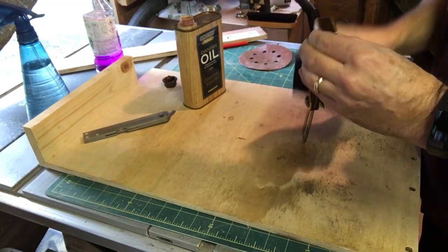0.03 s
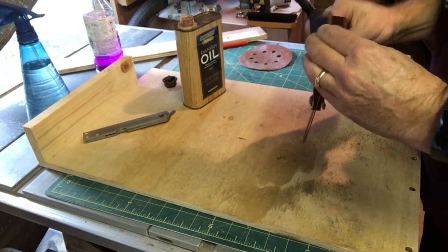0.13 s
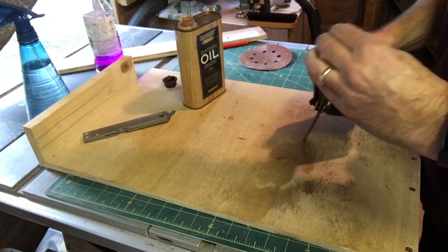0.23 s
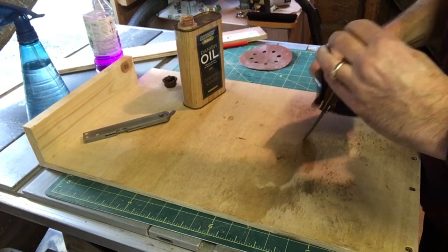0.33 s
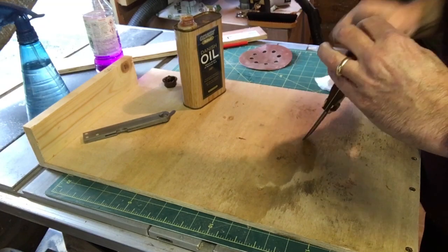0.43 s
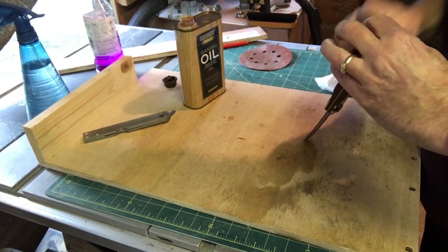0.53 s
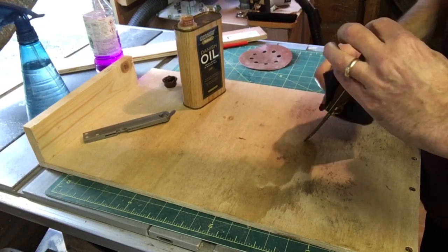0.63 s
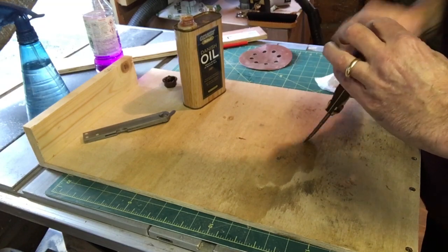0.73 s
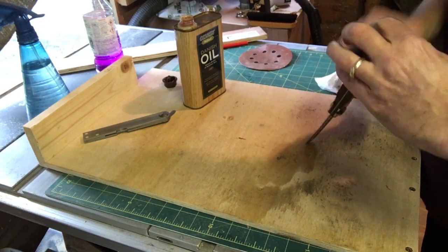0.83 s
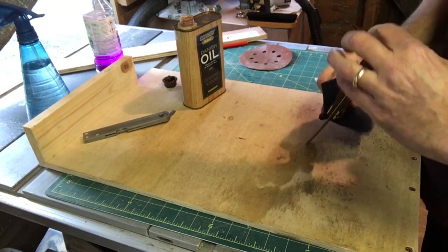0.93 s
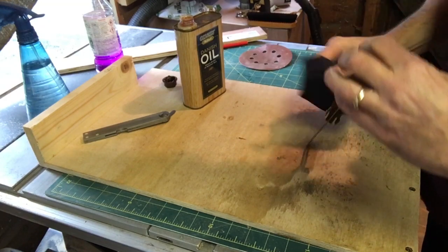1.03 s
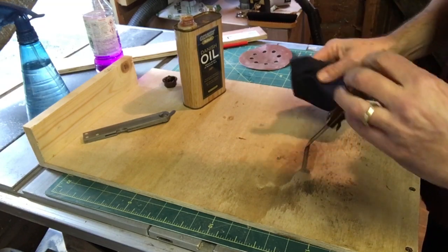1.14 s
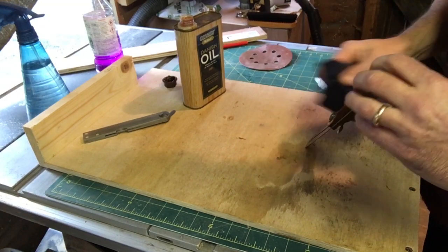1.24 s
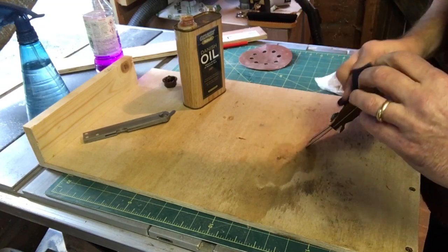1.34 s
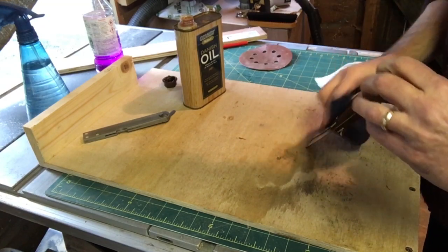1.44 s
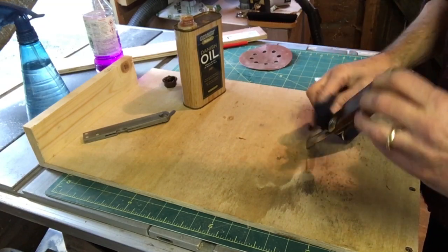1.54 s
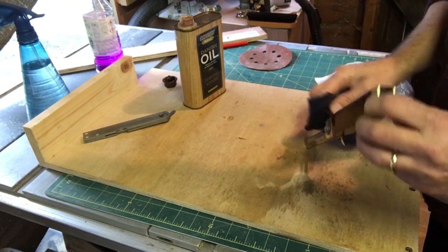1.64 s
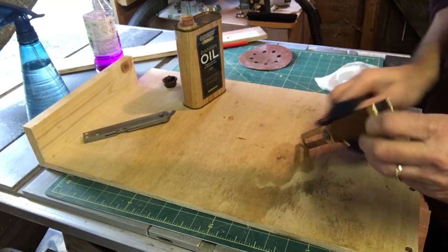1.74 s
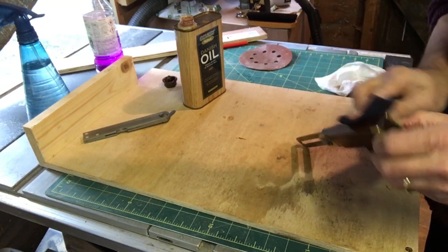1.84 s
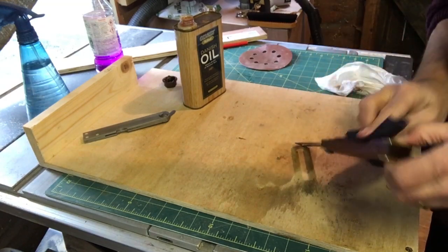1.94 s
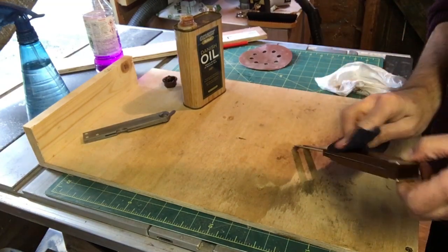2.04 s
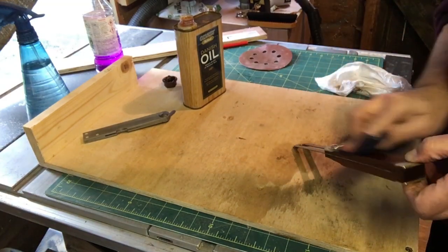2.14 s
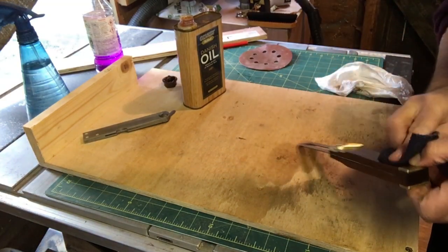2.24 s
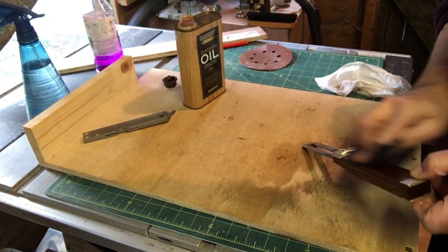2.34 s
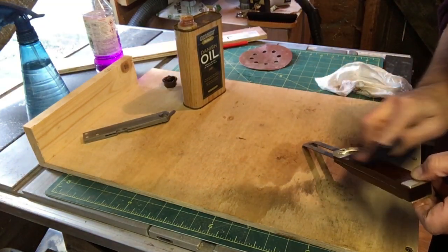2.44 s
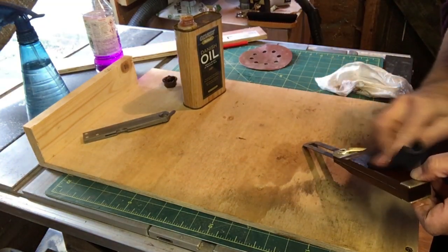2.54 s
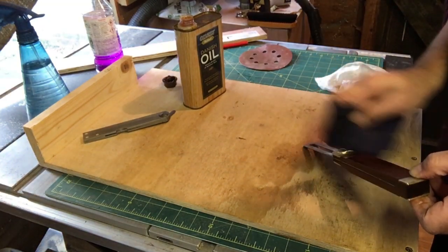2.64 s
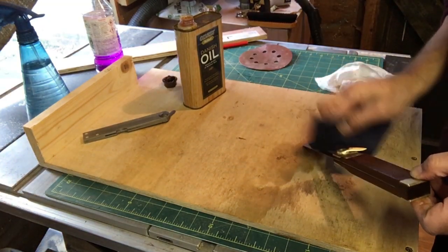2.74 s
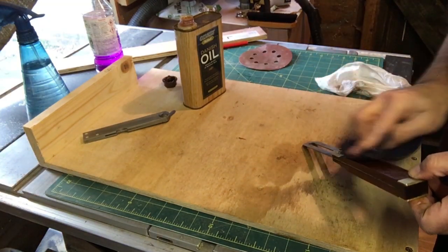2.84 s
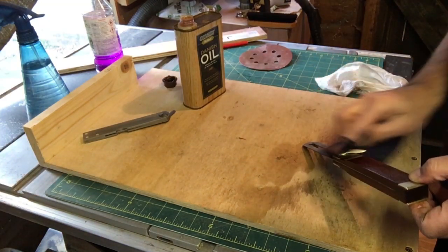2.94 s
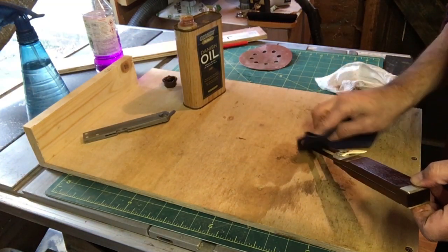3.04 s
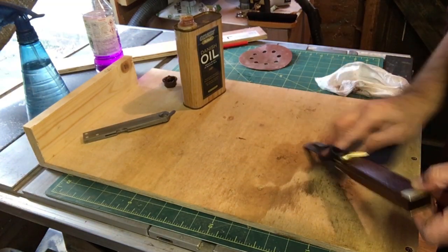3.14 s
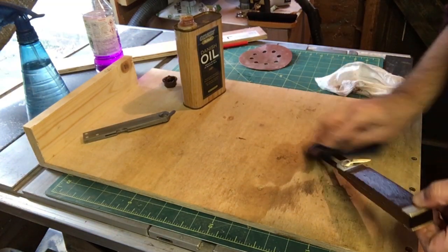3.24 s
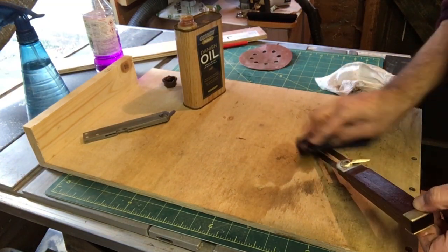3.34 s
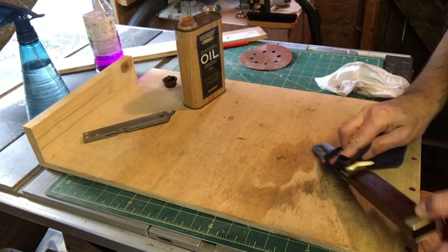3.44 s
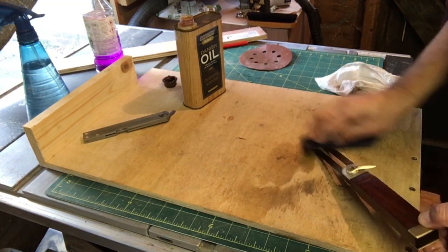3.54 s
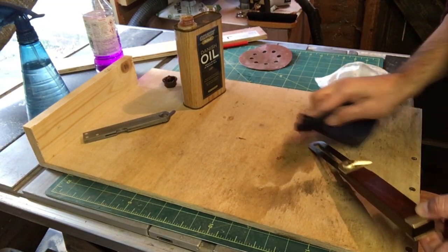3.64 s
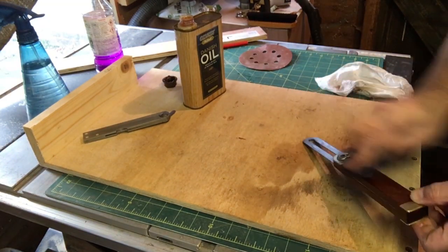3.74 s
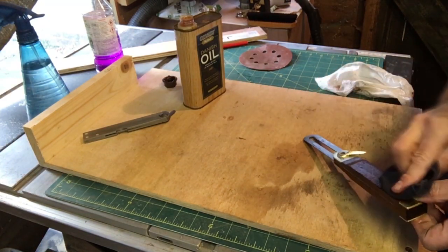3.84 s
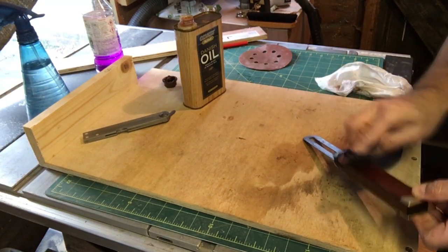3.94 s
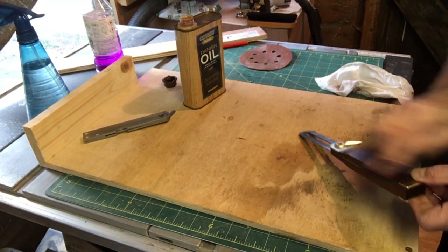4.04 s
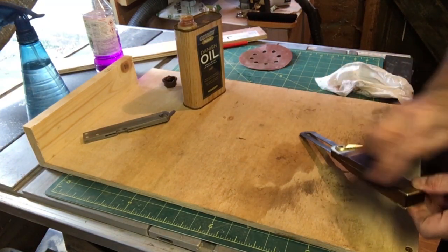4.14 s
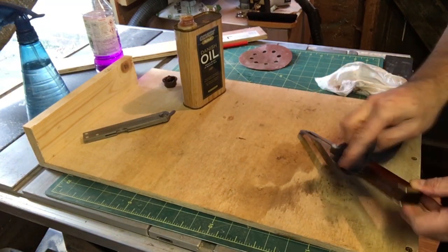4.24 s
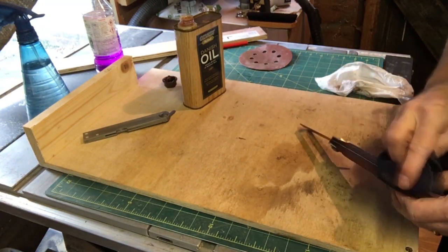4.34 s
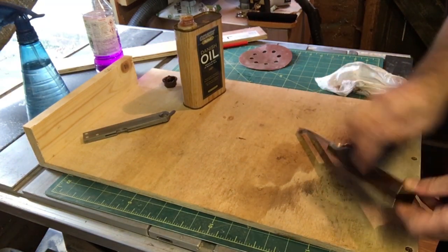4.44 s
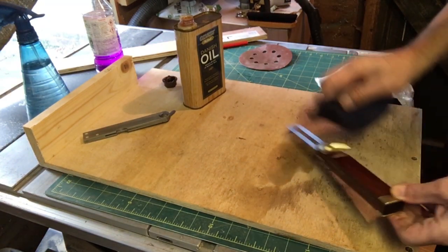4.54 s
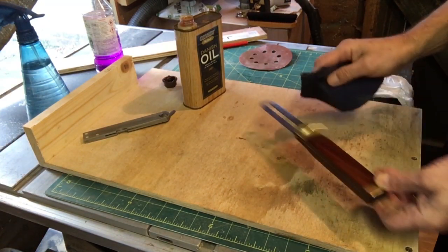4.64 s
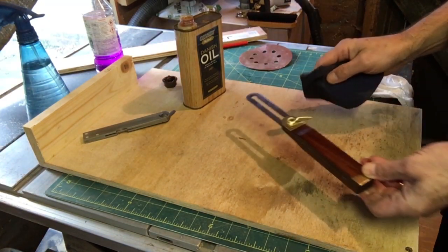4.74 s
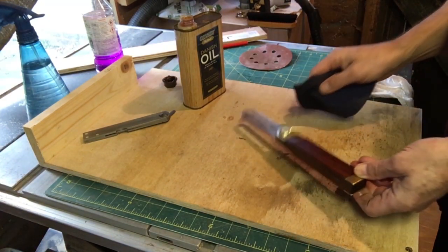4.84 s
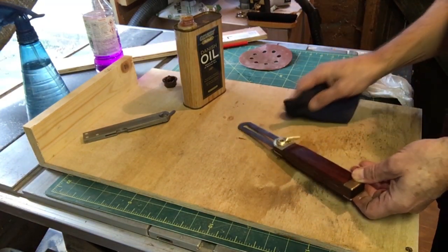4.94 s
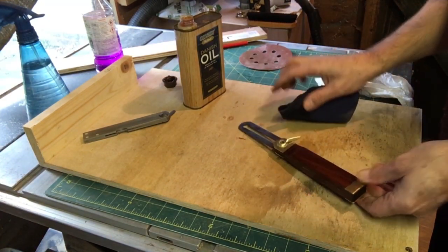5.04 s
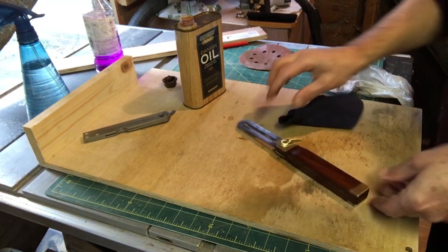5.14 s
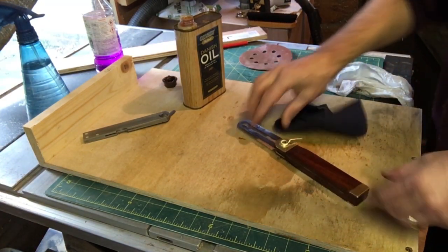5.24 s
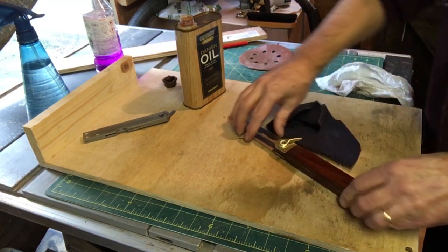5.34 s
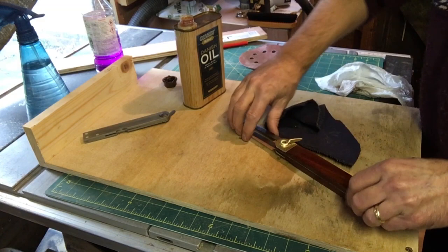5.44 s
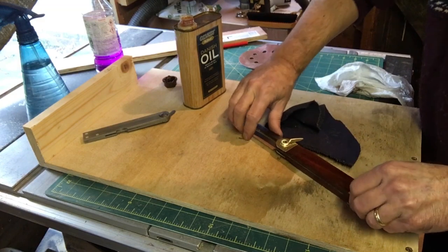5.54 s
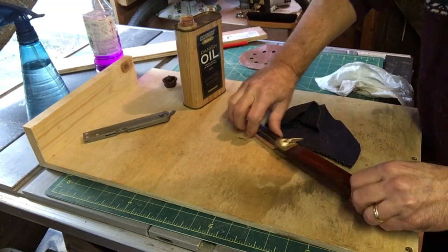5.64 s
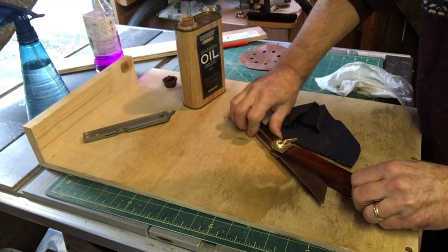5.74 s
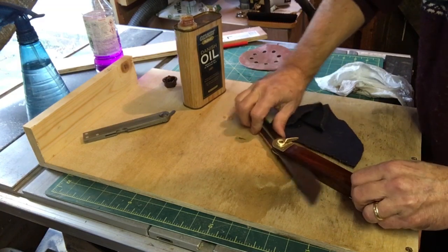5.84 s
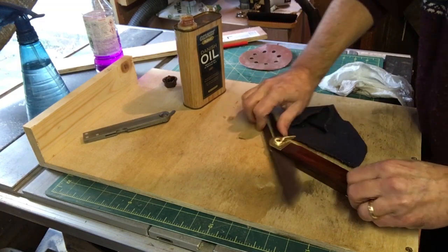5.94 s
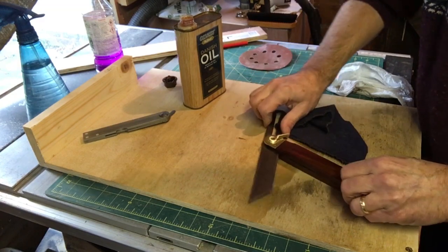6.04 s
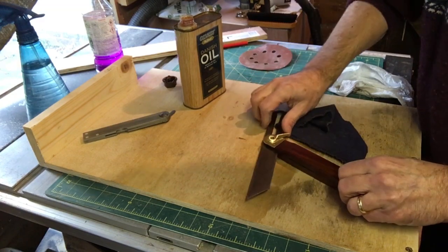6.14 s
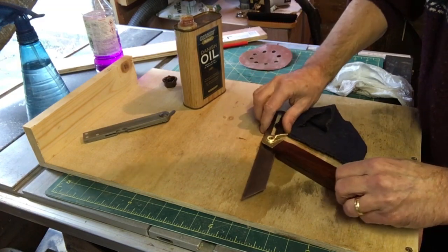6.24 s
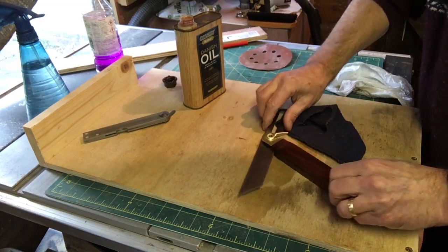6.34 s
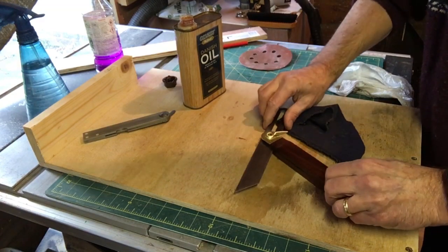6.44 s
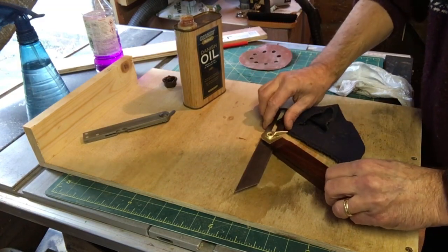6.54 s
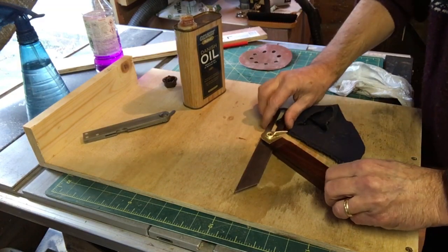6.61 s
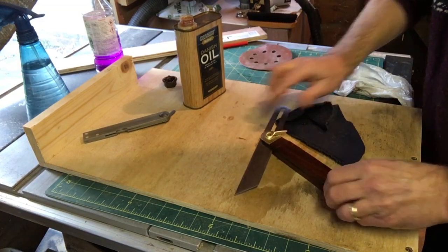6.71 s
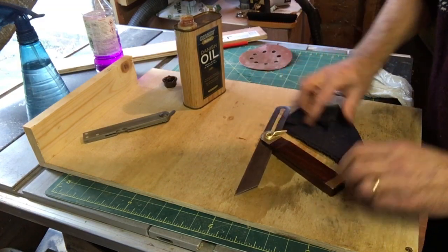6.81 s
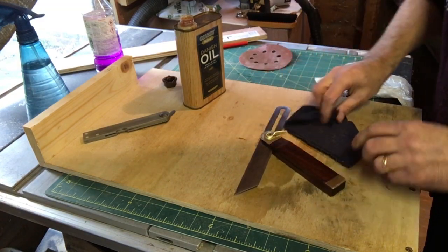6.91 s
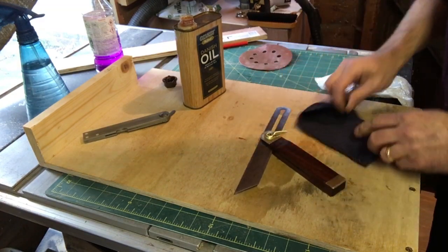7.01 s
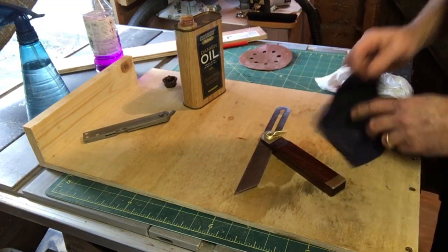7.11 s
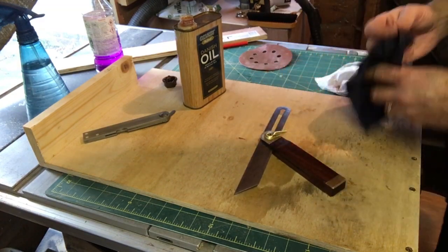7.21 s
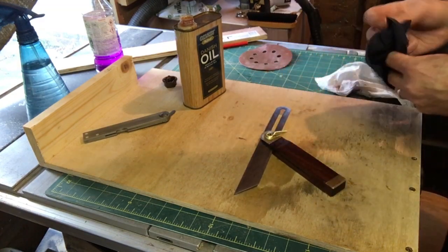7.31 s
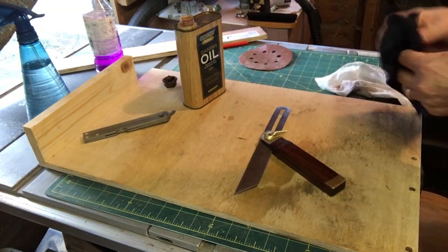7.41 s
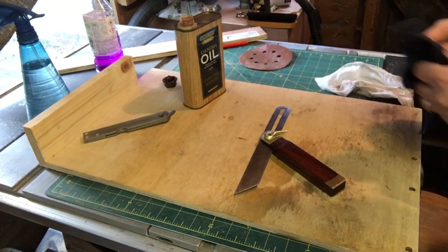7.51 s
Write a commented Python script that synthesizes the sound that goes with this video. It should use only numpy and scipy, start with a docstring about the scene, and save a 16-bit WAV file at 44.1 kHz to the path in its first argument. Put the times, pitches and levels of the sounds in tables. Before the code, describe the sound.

Close miked and nearly dry: dry, hissing cloth strokes over wood and steel, growing firmer, with faint bumps, gritty scratches and tiny squeaks as the tool skids on plywood. Rubbing stops; bright steel clacks lead into a hard wooden knock and chatter. Then come softer knocks, a metal blade sliding open in short scrapes, a near-quiet gap, and a couple of quick cloth rustles over faint room rumble.

```python
"""In a small, dry workshop with a low rumble, an oily cloth wipes a sliding bevel, its tip resting on a plywood board.
The tip drags and bumps; then the steel blade taps down, the wooden handle drops and rocks, and the blade is swung
open over the wood. The cloth is picked up again. One close microphone.
Rubbing is made of dense random slips, coloured or sent through resonances; blows are noise cracks with ringing modes."""
import sys
import numpy as np
from scipy import signal
from scipy.fft import rfft, irfft
from scipy.io import wavfile
from scipy.ndimage import uniform_filter1d

SR = 44100
rng = np.random.default_rng(int(sys.argv[2]) if len(sys.argv) > 2 else 0)


def store_wav(level_fs):
    """Save 16-bit WAV to argv[1]."""
    pcm = np.round(np.clip(np.atleast_2d(level_fs), -1, 1) * 32767)
    wavfile.write(sys.argv[1], SR, pcm.T.astype(np.int16))


N = 333816  # length of the scene in samples
RING = SR // 2  # longest ring of one event in samples

# Spectra of noise: f/Hz, relative density/dB per Hz
# workshop background
SHOP_COLOUR = [(20, -26.5), (45, 0), (75, 1), (115, -7), (180, -13.5), (280, -14.5), (480, -21.5),
               (1000, -24), (2500, -28), (6000, -32.5), (10000, -42), (15500, -52.5)]
# bench booming under the board
BENCH_COLOUR = [(40, -25), (70, -9.5), (115, -7.5), (165, 1), (200, -16), (400, -41)]
# crowded resonances of the struck board
BOARD_COLOUR = [(60, -23), (150, -15), (200, -24.5), (255, -1.5), (400, -5.5), (480, -12), (900, -2.5),
                (1900, -3.5), (2700, -9), (4500, -10.5), (7000, -18), (10400, -36.5), (12000, -32.5),
                (16000, -44.5)]
# crowded resonances of the struck blade
BLADE_COLOUR = [(190, -42), (255, -13), (385, -5), (490, -24), (780, -20), (1100, -5), (1500, -13),
                (2050, 3), (2750, -10), (3400, -5), (4150, -5), (4600, -16), (5350, -1), (6400, -14),
                (7400, -8), (8600, -21), (16000, -22)]
# board rumbling under a sliding tool
RUMBLE_COLOUR = [(90, -27), (170, -18), (210, -7.5), (250, 2), (320, -5.5), (400, 0.5), (490, -21.5),
                 (590, -1.5), (900, -25), (2000, -65)]
# hiss of the tip on the grain
SCRAPE_COLOUR = [(300, -36), (500, -25), (650, -2), (780, -4), (900, 2), (1150, 0), (1400, 2), (2200, 0.5),
                 (3400, -6), (4800, -9), (6200, -11.5), (8500, -31.5), (15000, -49)]
# fibres of the cloth
CLOTH_COLOUR = [(150, -28), (270, -5), (380, -16.5), (490, -9.5), (700, -14.5), (1300, -4.5), (2200, -1.5),
                (3100, 1), (4700, -3.5), (6000, -2.5), (8200, -8.5), (10300, -11.5), (11500, -10),
                (15500, -13.5)]

# Resonances: f/Hz, relative level/dB, t60/s
# plywood board
BOARD_MODES = [(247, -6, 0.27), (405, -9, 0.21), (565, -12, .33), (775, -13, 0.14), (838, -11, 0.16),
               (900, -7, 0.17), (945, -9, .14), (1190, -10, 0.22), (1259, -9, 0.18), (1364, -8, 0.14),
               (1431, -11, .12), (1687, -10, 0.14), (1815, -8, 0.16), (1990, -4, 0.09), (2549, 6, 0.042),
               (3130, 0, 0.05), (4366, -9, .06), (4750, -4, .035)]
# free steel blade
BLADE_MODES = [(262, -23, .16), (335, -16, .15), (392, -14, .14), (1030, -13, .08), (1200, -10, .09),
               (1413, -15, .08), (1760, -11, .07), (1945, 3, .028), (2220, -1, .045), (3180, -9, .07),
               (3580, -9, .04), (4170, -4, .03), (5300, 2, .015), (5620, 1, .015)]
# tool standing on its tip
TIP_MODES = [(265, -7.5, 0.079), (316.5, -9.5, .12), (386, -13.5, 0.097), (692, -16.5, 0.081),
             (944, -10.5, 0.1), (1118, -7, 0.1), (1428, -0.5, 0.059), (1770, -8.5, .1), (2200, 2, 0.022),
             (2507, -4, 0.051), (2920, -12, 0.06), (3380, -4, 0.04), (3960, 2.5, 0.019),
             (4540, -6.5, 0.028), (5900, -0.5, 0.017), (7030, -7, 0.027)]

# Weight landing on the board and shaking the bench, first the tool, then a hand: t/s, starting level/dB, t60/s
THUMPS = [(5.1526, -47.5, 0.33), (7.161, -53.5, 0.088)]
# Tool dropping flat, chattering, rocking and being pressed down: t/s, level/dB, contact brightness f/Hz, thud/dB
KNOCKS = [(5.0822, -40, 1500, 9), (5.09, -41.5, 700, 6), (5.1544, -15.5, 12500, -9),
          (5.1586, -21.5, 6500, -3), (5.172, -32.5, 480, 1), (5.2634, -32.5, 4380, 1), (5.308, -47, 520, 6),
          (5.407, -33, 4000, 1), (5.497, -38.5, 3480, 0.5), (6.148, -38.5, 846, 4.5), (6.149, -49, 2600, 7),
          (6.397, -49, 1500, -1.5)]
# Steel blade tapping down and bouncing: t/s, level/dB, contact brightness f/Hz
TAPS = [(4.912, -19, 11100), (4.967, -21.5, 8860), (5.0025, -32.5, 6200), (5.02, -42.5, 5970)]
# Held tool bumping its tip on the board: t/s, level/dB, contact brightness f/Hz, thud/dB
BUMPS = [(.249, -60, 2500, 17), (.517, -51.5, 2500, 4), (.796, -56, 2000, -8), (.801, -48, 1800, -10),
         (.816, -38.5, 3180, 4), (.992, -54, 2300, 13), (1.016, -60, 1190, 16), (2.2775, -39, 3500, -8),
         (2.2815, -39, 2520, -7), (2.727, -62, 7000, -7), (2.983, -52.5, 6500, -5), (4.103, -45, 3400, -7),
         (5.978, -50.5, 1300, -9)]
# Short scratches where an edge catches: t/s, rise/s, fall/s, level/dB, brightness f/Hz
SCRATCHES = [(0.507, 0.011, 0.0076, -45, 4740), (0.703, 0.015, 0.015, -46.5, 3400),
             (0.906, .004, 0.0072, -50.5, 5000), (2.98, 0.003, 0.0095, -44, 9100),
             (3.158, 0.027, 0.017, -39.5, 6400), (3.282, 0.0048, 0.02, -42.5, 7450),
             (3.392, 0.0038, 0.0049, -45, 3000), (3.451, 0.0077, 0.017, -40.5, 6700),
             (4.5, 0.019, 0.0068, -56, 3960), (7.077, 0.0009, 0.0037, -50, 11800),
             (7.310, 0.013, 0.013, -42.5, 7940)]
# Oily wood sticking and singing briefly: t/s, length/s, first pitch f/Hz, last pitch f/Hz, level/dB
SQUEAKS = [(3.448, 0.035, 2230, 2300, -45.5), (3.629, 0.25, 390.4, 378, -61.5),
           (3.71, 0.2, 2175, 2284, -53.5), (3.743, 0.061, 1452, 2170, -51), (4.019, 0.075, 1703, 1610, -52),
           (4.051, 0.063, 907, 886, -49), (4.06, 0.1, 308, 296, -58.5), (6.286, 0.025, 1400, 1380, -55.5)]

# Sliding moves; levels are peaks, before smearing and layer gains. The fastest point is held within 0.1-0.9.
# Blade pushed round over the wood: t/s, length/s, fastest point/share of length,
# hiss level/dB, scrape level/dB, board rumble level/dB, whistle level/dB
SWINGS = [(5.817, 0.17, 0.28, -55, -55, -71, -54), (5.953, 0.11, 0.24, -61, -50.5, -72, -51),
          (6.123, 0.11, 0.52, -69.5, -54, -62, -62), (6.23, 0.095, 0.2, -68, -57.5, -63, -62),
          (6.3, 0.18, 0.36, -82, -53, -57.5, -78)]
# Tool or hand skidding over the board: t/s, length/s, fastest point/share of length,
# scrape level/dB, board rumble level/dB
SKIDS = [(0.185, 0.12, 0.85, -85, -67), (0.421, 0.18, 0.8, -63.5, -68), (0.695, 0.11, 0.2, -59, -63),
         (0.82, 0.28, 0.05, -71, -61), (1.416, 0.088, 0.6, -62, -64), (1.788, 0.054, 0.5, -60.5, -64),
         (2.043, 0.13, 0.19, -55, -61), (2.406, 0.062, 0.5, -60, -68.0), (2.571, 0.049, 0.48, -60.5, -76),
         (2.718, 0.17, 0.42, -58.5, -64), (3.128, 0.26, 0.27, -56, -70.5),
         (3.287, 0.53, 0.19, -56.5, -67.5), (3.576, 0.17, 0.8, -53.5, -72), (3.676, 0.22, 0.34, -49.5, -73),
         (3.934, 0.23, 0.24, -50, -65), (4.146, 0.1, 0.36, -57.5, -82), (4.463, 0.089, 0.3, -77, -66.5),
         (5.278, 0.39, 0.6, -58, -60), (5.652, 0.05, 0.2, -43.5, -76), (5.67, 0.1, 0.15, -53, -66),
         (6.813, 0.18, 0.45, -62.5, -75.5), (7.089, 0.12, 0.6, -53, -62), (7.302, 0.078, 0.56, -49, -59)]
# Cloth or skin sliding, one row per stroke of the hand: t/s, length/s, fastest point/share of length, level/dB
STROKES = [(0.0, 0.17, 0.44, -57), (0.15, 0.13, 0.6, -57.5), (0.275, 0.05, 0.4, -61),
           (0.342, 0.19, 0.53, -57.5), (0.541, 0.14, 0.65, -54.5), (0.681, 0.15, 0.27, -52),
           (0.808, 0.2, 0.33, -56), (1.281, 0.094, 0.72, -58), (1.359, 0.17, 0.6, -53.5),
           (1.681, 0.36, 0.2, -60.5), (1.925, 0.17, 0.68, -60), (2.138, 0.11, 0.91, -52.5),
           (2.259, 0.16, 0.52, -55.5), (2.421, 0.13, 0.3, -58), (2.554, 0.19, 0, -66),
           (2.733, 0.16, 0.73, -54), (2.897, 0.22, 0.33, -55), (3.089, 0.14, 0.43, -54.5),
           (3.213, 0.12, 0.82, -52.5), (3.333, 0.14, 0.15, -54.5), (3.491, 0.12, 0.7, -50),
           (3.692, 0.17, 0.77, -50.5), (3.879, 0.15, 0.22, -53.5), (4.003, 0.11, 0.6, -49.5),
           (4.134, 0.13, 0.18, -57.5), (4.254, 0.13, 0.5, -54.5), (4.396, 0.079, 0.32, -58),
           (5.06, 0.12, 0.6, -67), (5.31, 0.097, 0.5, -63.5), (5.43, 0.38, 0.08, -67.5),
           (5.646, 0.078, 0.26, -43.5), (6.806, 0.26, 0.55, -69), (7.066, 0.15, 0.4, -52),
           (7.217, 0.17, 0.55, -64.5), (7.306, 0.11, 0.28, -46), (7.427, 0.09, 0.75, -55.5)]
# Hands at work on tool or cloth: start t/s, end t/s
HELD_S = [(0.0, 0.95), (1.66, 4.54), (5.64, 6.47), (6.81, 9.06)]

SHOP_DB = -65
TOP_HZ = 15850  # treble limit of the microphone path
STROKE_SWELL, SKID_SWELL = 1.21, 1  # loudness as a power of speed: strokes; skids and the swinging blade
SMEAR_S = 0.0086  # no move starts or stops dead
WIPE_SCRAPE_DB, WIPE_RUMBLE_DB = -17, -18.5  # what a stroke stirs in tool and board, against its own drive
REST_RUSTLE_DB, REST_SCRAPE_DB = -73, -72  # the hands never keep quite still
SQUEAK_WAVER, SQUEAK_WAVER_RATE = .06, 400  # spread as a share of pitch, changes a second
CAUGHT_S, CAUGHT_DECAY_S = 5.235, 0.012  # fingers land on the fallen tool and stop its ring
BLOOM_CYCLES, BLOOM_T60_S = 1.7, 0.061  # the low notes of a blow take a moment to build
MODE_DETUNE = 0.0055  # spread of pitch from blow to blow, as a share
TWIN_SPLIT_HZ, TWIN_DB = 32, -3.5  # each mode has a weaker twin close by: spread, level
SNAP_RATE, SNAP_DB = 500, -8  # single threads snapping: a second, dB against the fine grain
FOLD_DB, FOLD_RATE = 1.2, 14  # colour shift with the folds: dB, changes a second
TAP_ECHO_S, TAP_ECHO = .0038, .7  # bench echo of a tap: delay, gain


def undb(db):
    """Decibels to gain."""
    return 10 ** (np.asarray(db) / 20)


def unit(x, count=None):
    """Scale to rms 1, judged over the first count samples."""
    return x / np.sqrt(np.mean(x[:count] ** 2))


def colour(x, points):
    """Shape a sound with a spectrum of (Hz, dB) points, joined along log frequency."""
    hz, db = np.transpose(points)
    bins = np.maximum(np.fft.rfftfreq(len(x), 1 / SR), 1)
    gain = undb(np.interp(np.log(bins), np.log(hz), db))
    return irfft(rfft(x) * gain, len(x))


def cut(x, hz, kind, order=2):
    """Butterworth filter, its corner kept below the top of the band."""
    edge = np.minimum(hz, .47 * SR)
    return signal.sosfilt(signal.butter(order, edge, kind, fs=SR, output="sos"), x)


def fade(t60):
    """Exponential decay, falling 60 dB in t60 seconds."""
    return np.exp(-np.log(1000) * np.arange(RING) / SR / t60)


def walk(rate):
    """Smooth random wander of rms 1 or near it, with rate changes a second."""
    step = max(int(SR / rate), 1)
    held = np.repeat(rng.standard_normal(N // step + 1), step)
    return unit(uniform_filter1d(held, step))[:N]


def add(track, s, sound):
    """Mix a sound into a track at a time."""
    start = int(s * SR)
    track[start:start + len(sound)] += sound[:N - start]


def during(start, end):
    """A gate that opens and closes softly."""
    t = np.arange(N) / SR
    is_open = 1. * ((t > start) & (t < end))
    return uniform_filter1d(is_open, SR // 50)


def slips(rate, spread_db):
    """Stick-slip: tiny random clicks of uneven size, rate a second."""
    hit = rng.random(N) < rate / SR
    size = undb(spread_db * np.minimum(rng.exponential(size=N), 4))
    return unit(hit * rng.standard_normal(N) * size)


def shop():
    """Low rumble with a faint hiss: coloured noise whose level drifts slightly."""
    level = undb(SHOP_DB + 0.63 * walk(rate=2.9))
    return level * unit(colour(rng.standard_normal(N), SHOP_COLOUR))


def room(x, wet_db, low_t60, high_t60):
    """A cluttered workshop: a brief diffuse tail whose treble dies first."""
    noise = rng.standard_normal(RING)
    low = cut(noise, 2200, "low", order=1) * fade(low_t60)
    high = cut(noise, 3000, "high", order=1) * fade(high_t60)
    tail = (low + high) * (1 - fade(0.12))  # the walls answer a little later
    reverb = signal.fftconvolve(x, tail / np.linalg.norm(tail))[:N]
    return x + undb(wet_db) * reverb


def thump():
    """The bench under the board answers with a short, low boom of decaying noise."""
    out = np.zeros(N)
    for s, db, t60 in THUMPS:
        boom = unit(colour(rng.standard_normal(RING), BENCH_COLOUR))
        add(out, s, undb(db) * boom * fade(t60))
    return out


def ring(modes, scatter_db):
    """Modes in close, beating pairs; where the blow lands sets the strength, sign and exact pitch of each."""
    out, t = 0, np.arange(RING) / SR
    draws = rng.standard_normal((len(modes), 5))
    for (hz, db, t60), (size, sign, shift, split, phase) in zip(modes, draws):
        hz = hz * (1 + MODE_DETUNE * shift)
        main = np.sign(sign) * np.sin(2 * np.pi * hz * t)
        twin = np.sin(2 * np.pi * ((hz + TWIN_SPLIT_HZ * split) * t + phase))
        pair = main + undb(TWIN_DB) * twin
        bloom = 1 - np.exp(-t * hz / BLOOM_CYCLES)
        out = out + undb(db + scatter_db * size) * pair * fade(t60) * bloom
    return out


def blow(modes, points, crack_t60, body_t60, body_db, modes_db, body_hz=4300):
    """One impact: a short crack, a duller wash of crowded modes, and the clear modes."""
    crack, wash = (unit(colour(rng.standard_normal(RING), points)) for _ in range(2))
    body = cut(wash, body_hz, "low", order=1) * fade(body_t60)
    crowd = crack * fade(crack_t60) + undb(body_db) * body
    crowd = crowd - cut(crowd, 500, "low", order=1) * fade(BLOOM_T60_S)
    clear = ring(modes, scatter_db=1.2)
    return unit(crowd, count=SR // 100) + undb(modes_db) * unit(clear, count=SR // 100)


def strike(rows, response):
    """Wood is struck: a softer contact is duller; a hand's weight behind it adds thud and damps the ring."""
    out, t = np.zeros(N), np.arange(RING) / SR
    for s, db, bright_hz, thud_db in rows:
        hit = response() * np.exp(-t * 5.0 * max(thud_db, 0))
        hit = hit + (undb(thud_db) - 1) * cut(hit, 750, "low", order=1)
        hit = cut(hit, 220, "high", order=3)  # the small board radiates little bass
        hit = cut(hit, bright_hz, "low", order=3)
        add(out, s, undb(db) * unit(hit, count=SR // 100))
    return out


def knocks():
    """The tool falls flat and chatters; the board rings until fingers catch it, then the tool rocks under the hand."""
    def board():
        return blow(BOARD_MODES, BOARD_COLOUR, crack_t60=0.039, body_t60=0.15, body_db=-7.5, modes_db=-1.0)

    falling = strike([row for row in KNOCKS if row[0] < CAUGHT_S], board)
    rocking = strike([row for row in KNOCKS if row[0] >= CAUGHT_S], board)
    since_caught = np.maximum(np.arange(N) / SR - CAUGHT_S, 0)
    return falling * np.exp(-since_caught / CAUGHT_DECAY_S) + rocking


def taps():
    """Steel on plywood: a sharp, bright clack, echoed at once by the bench."""
    out = np.zeros(N)
    for s, db, bright_hz in TAPS:
        hit = blow(BLADE_MODES, BLADE_COLOUR, crack_t60=.016, body_t60=.125,
                   body_db=-10, modes_db=-2, body_hz=1800)
        echo = np.pad(cut(hit, 4390, "low", order=1), (int(TAP_ECHO_S * SR), 0))[:RING]
        clack = cut(hit + TAP_ECHO * echo, bright_hz, "low")
        add(out, s, undb(db) * unit(clack, count=SR // 100))
    return out


def bumps():
    """The tip bumps the board and sounds the tool's modes; the hand damps the ring."""
    def tip():
        return blow(TIP_MODES, BOARD_COLOUR, crack_t60=0.026, body_t60=0.16, body_db=-6.0, modes_db=6.5)

    return strike(BUMPS, tip)


def glide(length, fastest, swell):
    """Loudness of one sliding move: speed rises from rest, peaks and returns to rest."""
    top = np.clip(fastest, .1, .9)
    angle = np.interp(np.linspace(0, 1, int(length * SR)), [0, top, 1], [0, np.pi / 2, np.pi])
    return np.abs(np.sin(angle)) ** swell


def moves(rows, swell, axis):
    """Gain over time of a table of like moves, their level taken from one column."""
    gain = np.zeros(N)
    for row in rows:
        start, length, fastest = row[:3]
        add(gain, max(start, 0), undb(row[axis]) * glide(length, fastest, swell))
    return uniform_filter1d(gain, int(SMEAR_S * SR))


def sliding():
    """Strength of rustle, scrape, board rumble and blade whistle, summed over all the moves of the hands."""
    wipe = moves(STROKES, STROKE_SWELL, axis=3)
    skid_scrape, skid_rumble = (moves(SKIDS, SKID_SWELL, axis=k) for k in (3, 4))
    hiss, swing_scrape, swing_rumble, whistle = (moves(SWINGS, SKID_SWELL, axis=k) for k in (3, 4, 5, 6))
    held = sum(during(start, end) for start, end in HELD_S)
    rustle = wipe + hiss + undb(REST_RUSTLE_DB) * held
    # separate rubbing contacts add by power
    scrape = np.hypot(undb(WIPE_SCRAPE_DB) * wipe, skid_scrape + swing_scrape)
    scrape = scrape + undb(REST_SCRAPE_DB) * held
    rumble = np.hypot(undb(WIPE_RUMBLE_DB) * wipe, skid_rumble + swing_rumble)
    return rustle, scrape, rumble, whistle


def sing(hz, width_hz):
    """Friction held on one resonance: a tone that wavers in pitch and strength."""
    b, a = signal.iirpeak(hz, hz / width_hz, fs=SR)
    return unit(signal.lfilter(b, a, slips(rate=8000, spread_db=1.3)))


def swing(whistle):
    """The swinging blade whispers high with a thin tone below."""
    whisper = cut(sing(hz=5660, width_hz=660), 5700, "high", order=4)
    whisper = cut(whisper, 6900, "low", order=4)
    return (whisper + undb(-14.0) * sing(hz=1470, width_hz=110)) * whistle


def squeaks():
    """Stick-slip locks onto one rough tone that glides as the cloth or blade travels."""
    out = np.zeros(N)
    for s, length, first_hz, last_hz, db in SQUEAKS:
        grip = glide(length, 0.24, 0.78)
        waver = 1 + SQUEAK_WAVER * walk(SQUEAK_WAVER_RATE)[:len(grip)]
        hz = np.linspace(first_hz, last_hz, len(grip)) * waver
        flutter = undb(1.9 * walk(rate=123)[:len(grip)])
        tone = np.sin(2 * np.pi * np.cumsum(hz) / SR)
        add(out, s, undb(db) * grip * unit(flutter * tone))
    return out


def rubbed(force, wander_db, wander_rate):
    """The tip's modes under a sliding force; each swells and fades as the contact point travels."""
    out = 0
    for hz, db, t60 in TIP_MODES:
        radius = np.exp(-np.log(1000) / (t60 * SR))
        angle = 2 * np.pi * hz / SR
        mode = signal.lfilter([np.sin(angle)], [1, -2 * radius * np.cos(angle), radius ** 2], force)
        out = out + mode * undb(db + wander_db * walk(wander_rate))
    return unit(out)


def scratches():
    """An edge bites, chatters so that the tool sings briefly, and slides free."""
    out, t = np.zeros(N), np.arange(RING) / SR
    force = cut(slips(rate=6300, spread_db=3.5), 1900, "high", order=1)
    chatter = rubbed(force, wander_db=4.0, wander_rate=9) + undb(2.0) * unit(force)
    chatter = cut(chatter, 760, "high")
    for s, rise, fall, db, bright_hz in SCRATCHES:
        grip = np.where(t < rise, t / rise, np.exp(-np.maximum(t - rise, 0) / fall))
        bite = cut(np.roll(chatter, -int(s * SR))[:RING], bright_hz, "low")
        add(out, s, undb(db) * grip * unit(bite, count=SR // 20))
    return out


def drag(scrape, pressure):
    """The tip judders over the grain, hissing and ringing the tool; pressure brings out the board's low notes."""
    judder = slips(rate=6000, spread_db=1.3) * undb(1.5 * walk(rate=60))
    hiss = unit(colour(judder, SCRAPE_COLOUR))
    tones = rubbed(slips(rate=3300, spread_db=-0.5), wander_db=8.5, wander_rate=12)
    tones = unit(cut(tones, 470, "high"))
    rumble = unit(colour(slips(rate=1500, spread_db=1.5), RUMBLE_COLOUR))
    return (undb(-2.0) * hiss + undb(-6.5) * tones) * scrape + undb(0.6) * rumble * pressure


def cloth(rustle):
    """Thousands of fibres catch and let go, some threads snap; the grip flutters and folds shift the colour."""
    grain = slips(rate=20000, spread_db=0.5) + undb(SNAP_DB) * slips(SNAP_RATE, spread_db=0.5)
    fibres = colour(grain, CLOTH_COLOUR)
    dull = cut(fibres, 2900, "low", order=1)
    tilt = FOLD_DB * walk(FOLD_RATE)
    fibres = dull * undb(-tilt) + (fibres - dull) * undb(tilt)
    # the board mirrors the rustle, later or sooner as the hand rises and falls
    lag = SR * (.0026 + 0.000147 * walk(rate=5))
    mirror = np.interp(np.arange(N) - lag, np.arange(N), cut(fibres, 800, "high"))
    flutter = undb(0.32 + 2.0 * walk(rate=81))
    return unit(fibres + 0.47 * mirror) * rustle * flutter


def scene():
    """All the work at the bench, heard in the room."""
    rustle, scrape, pressure, whistle = sliding()
    blows = thump() + knocks() + taps() + bumps()
    rubbing = swing(whistle) + squeaks() + scratches() + drag(scrape, pressure) + cloth(rustle)
    return (shop() + room(blows + rubbing, wet_db=-15.0, low_t60=0.23, high_t60=0.11))[None]


def record(dry):
    """The recorder cuts the top with a steep elliptic low-pass."""
    return signal.sosfilt(signal.ellip(10, .2, 70, TOP_HZ, fs=SR, output="sos"), dry)


dry = scene()
out = record(dry)
store_wav(out)
```